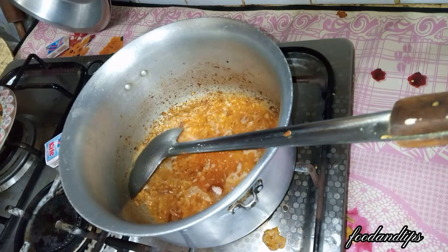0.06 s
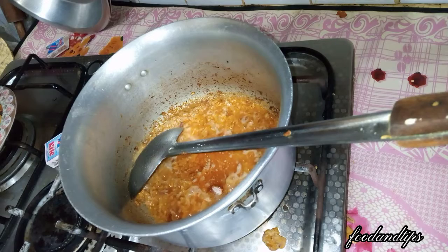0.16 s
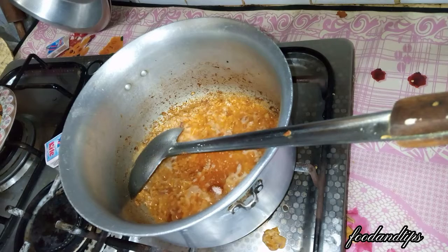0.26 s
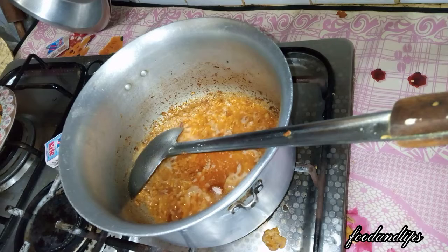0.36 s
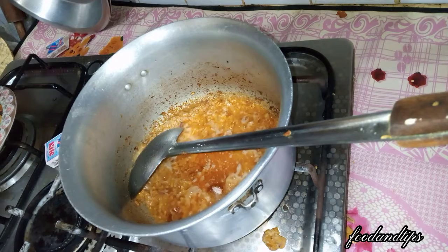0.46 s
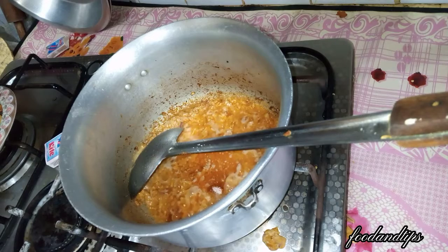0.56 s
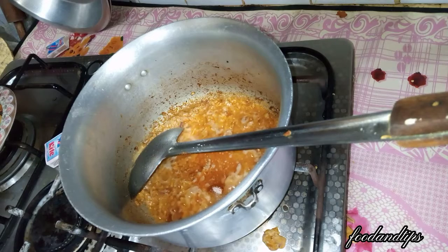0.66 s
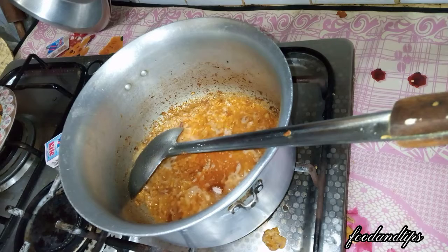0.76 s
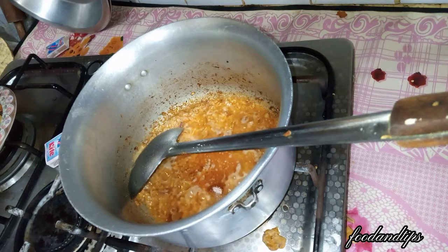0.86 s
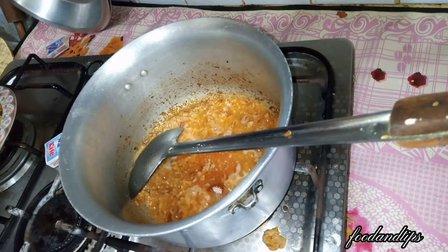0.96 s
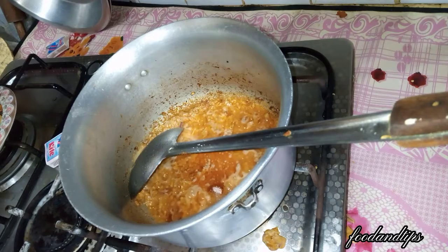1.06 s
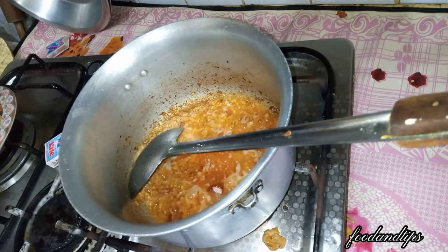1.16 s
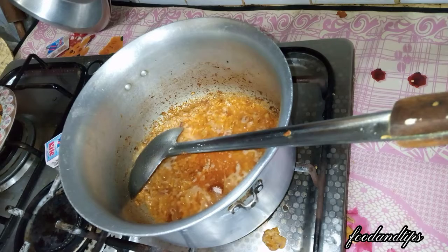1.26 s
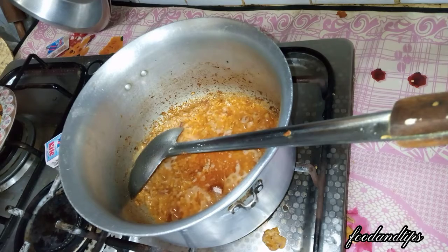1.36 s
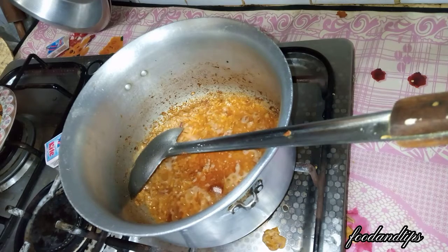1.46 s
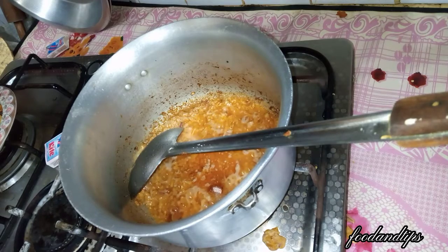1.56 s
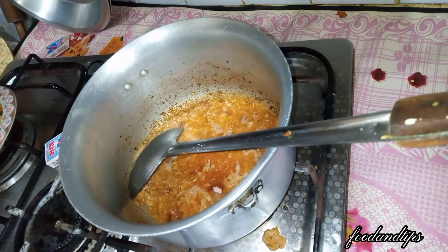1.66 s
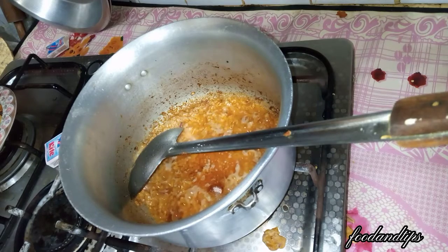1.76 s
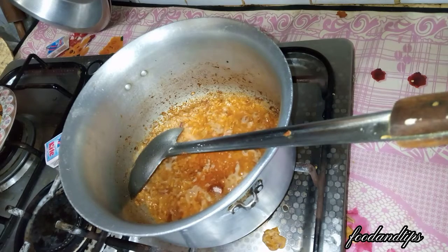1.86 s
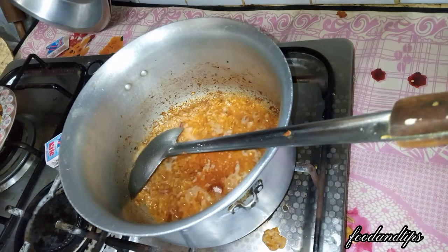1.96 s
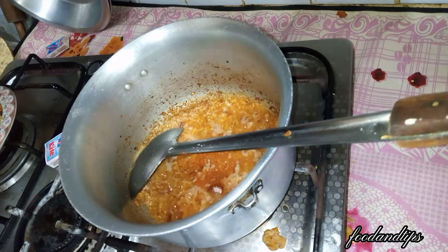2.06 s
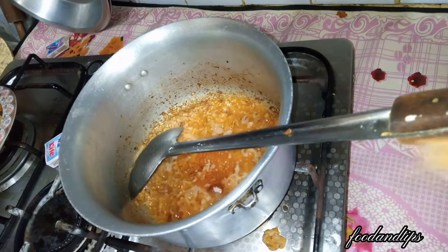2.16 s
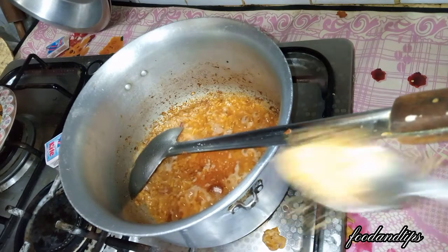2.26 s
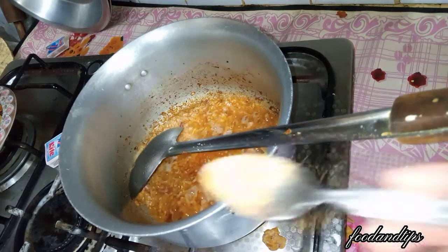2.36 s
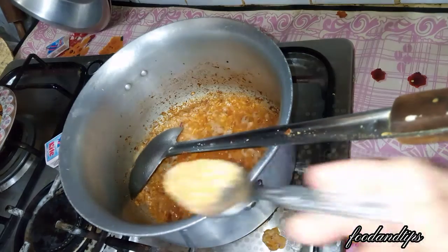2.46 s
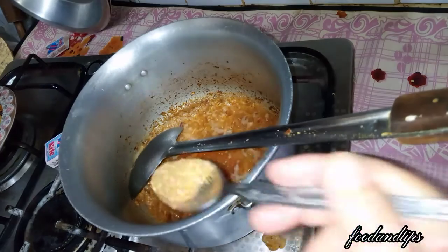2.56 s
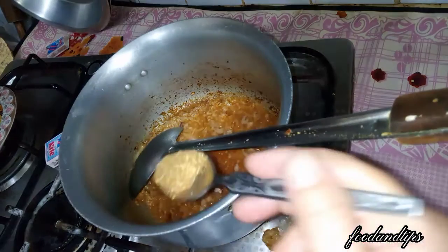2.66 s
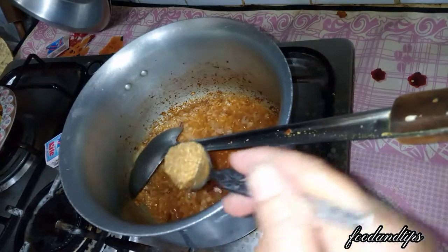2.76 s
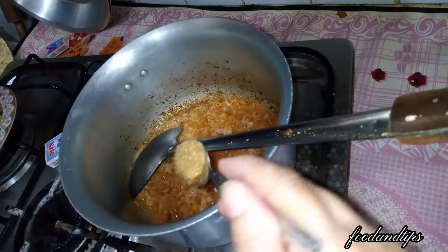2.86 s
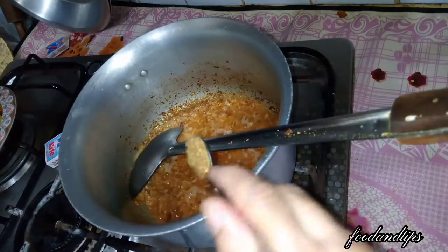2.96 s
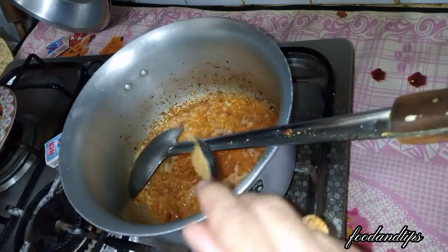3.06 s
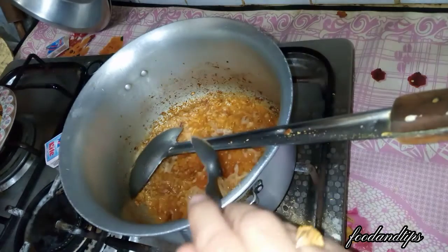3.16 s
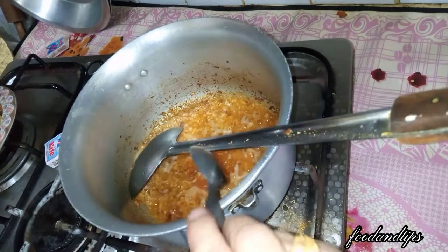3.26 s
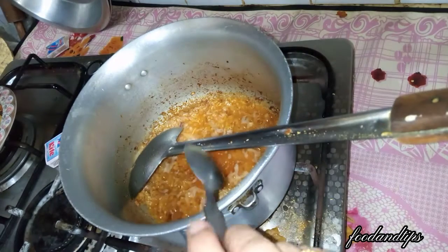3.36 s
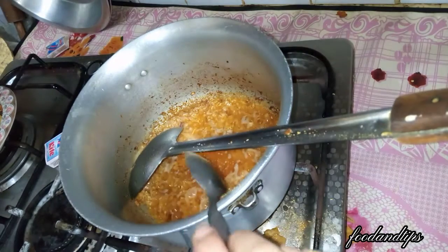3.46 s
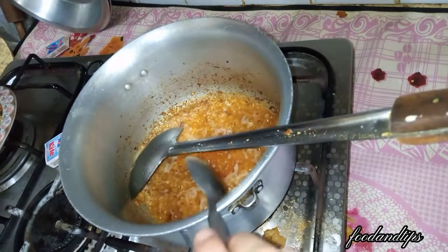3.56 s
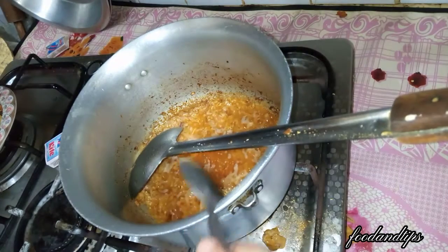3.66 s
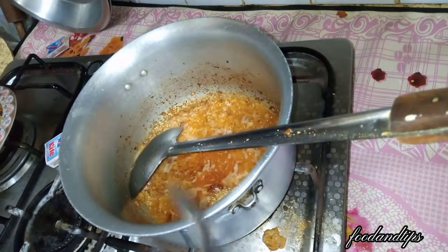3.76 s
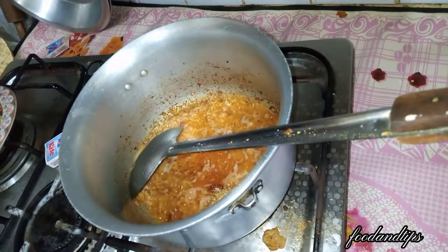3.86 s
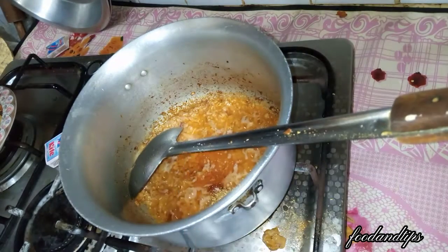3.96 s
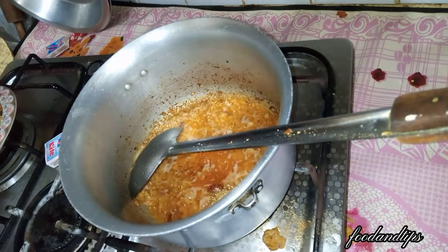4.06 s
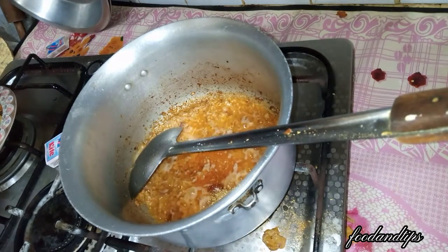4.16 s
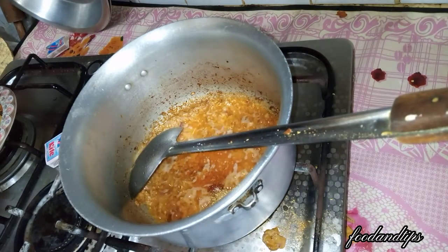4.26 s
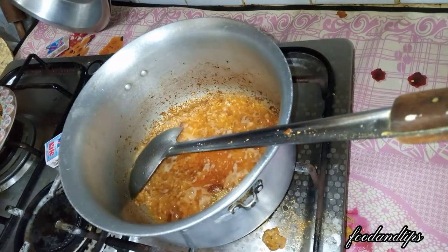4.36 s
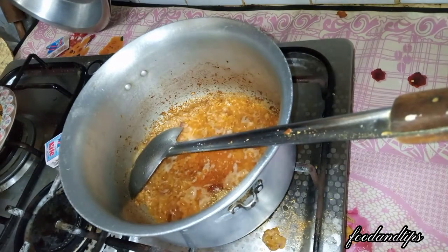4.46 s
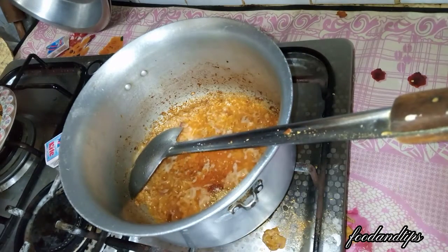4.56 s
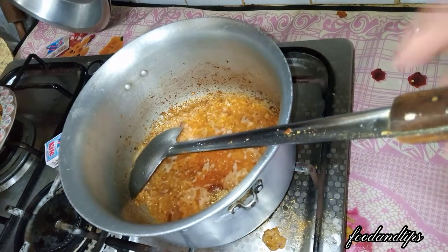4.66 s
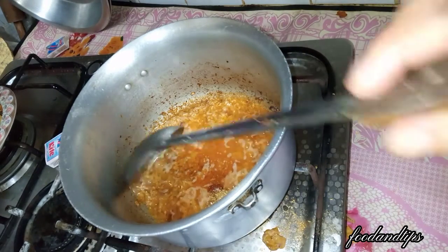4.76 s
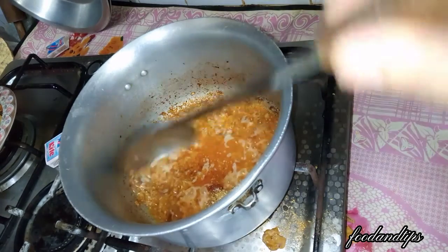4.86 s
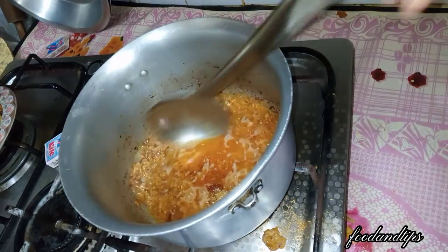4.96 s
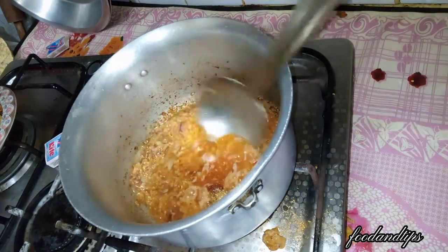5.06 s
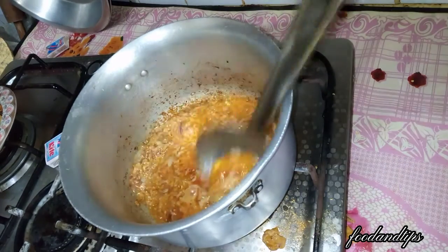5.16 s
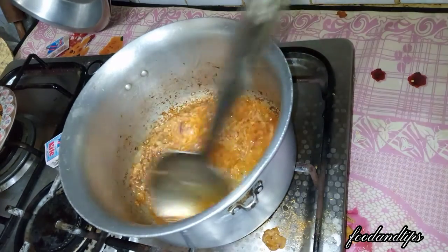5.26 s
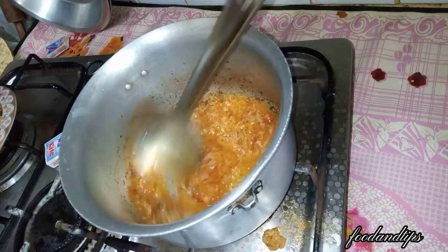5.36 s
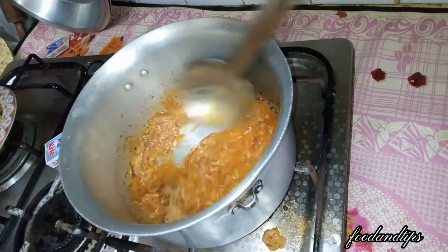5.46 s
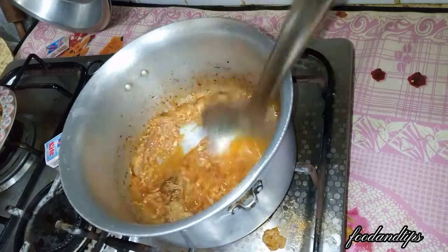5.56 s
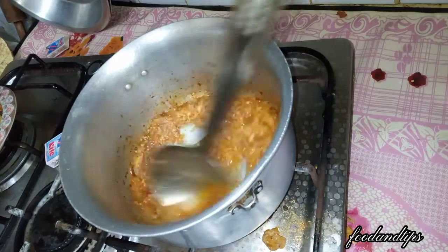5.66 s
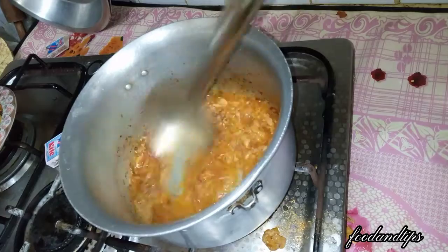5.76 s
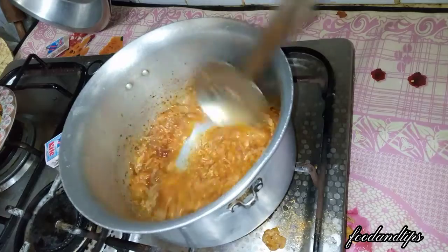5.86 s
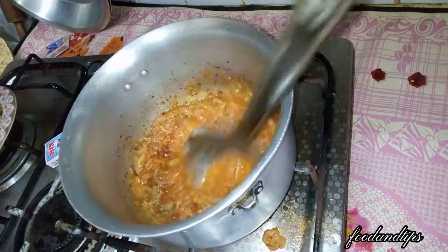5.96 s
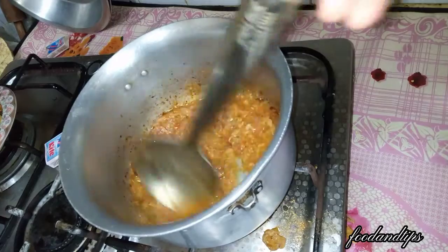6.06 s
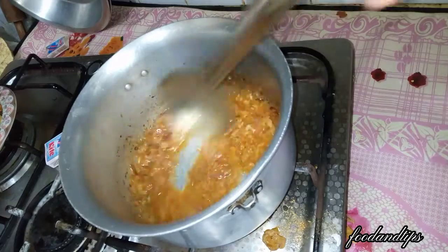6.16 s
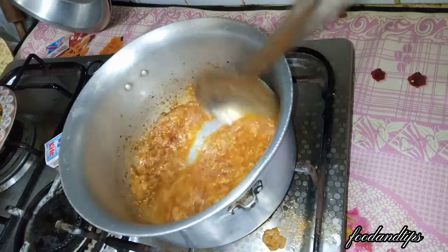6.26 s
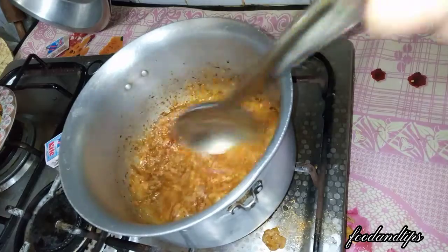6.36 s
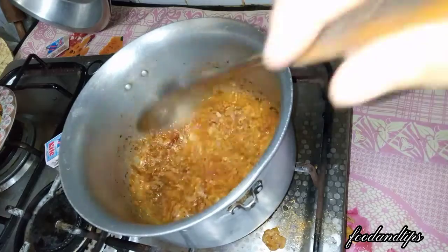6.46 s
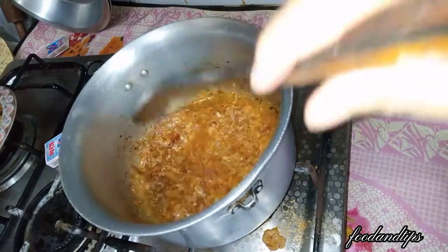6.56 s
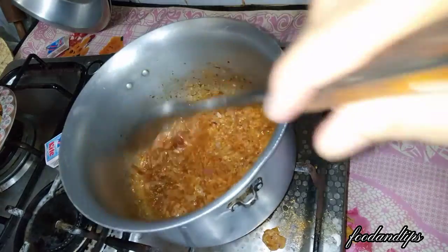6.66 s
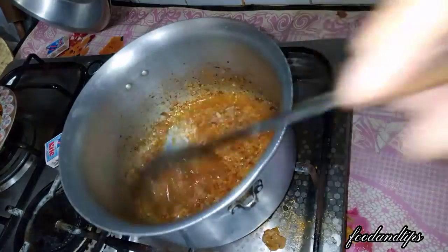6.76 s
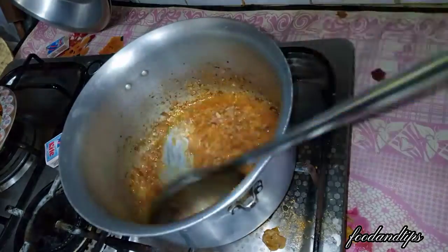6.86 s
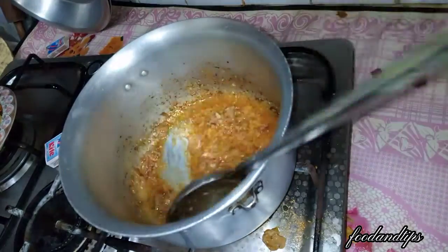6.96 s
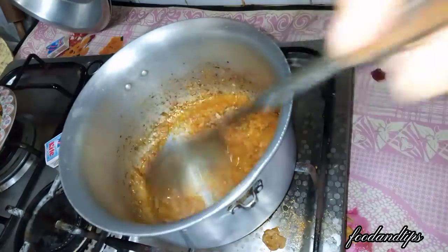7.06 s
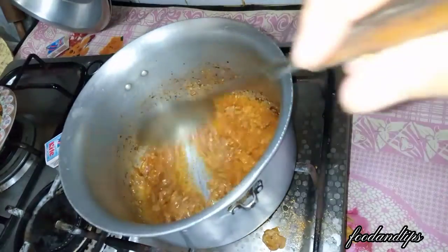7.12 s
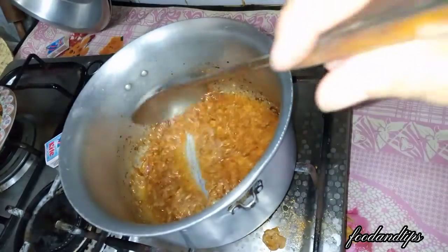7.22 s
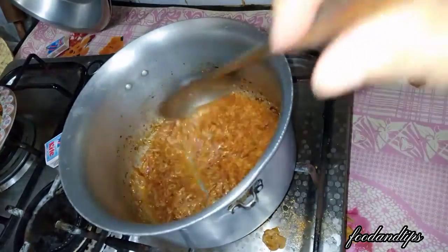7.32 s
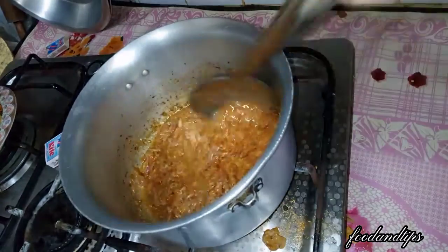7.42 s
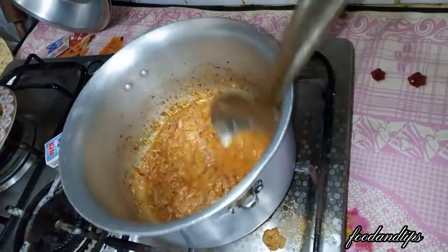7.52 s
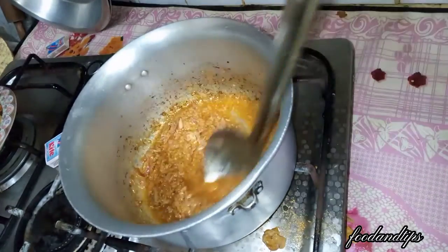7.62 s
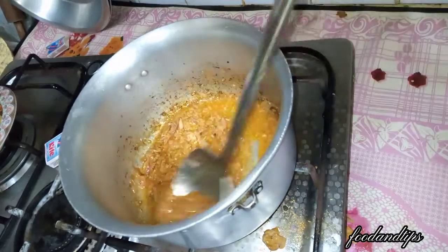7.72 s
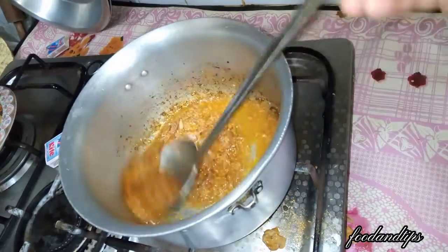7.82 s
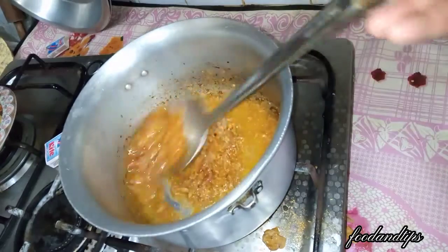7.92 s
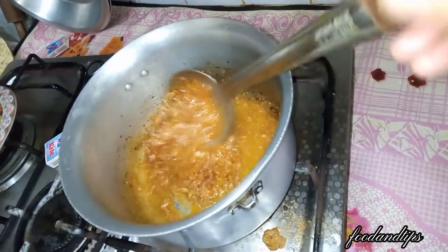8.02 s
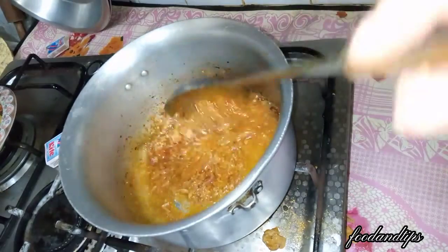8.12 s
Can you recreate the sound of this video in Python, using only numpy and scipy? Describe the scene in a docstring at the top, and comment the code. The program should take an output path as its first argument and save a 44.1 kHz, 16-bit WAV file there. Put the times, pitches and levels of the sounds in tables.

```python
"""Stirring a sizzling pot

Onions sizzle in oily sauce in an aluminium pot on a gas stove, in a small hard-walled kitchen.
Dull knocks come from further off, and a spoon of paste is tapped off against the resting steel ladle.
Then the ladle stirs: it clanks, rings, and scrapes the pot through the thick food.
Blows are short noise bursts and dying sines; scraping and sizzling are random clicks through resonances."""
import sys
import numpy as np
from scipy import signal
from scipy.fft import rfft, irfft
from scipy.io import wavfile

SR = 44100
rng = np.random.default_rng(int(sys.argv[2]) if len(sys.argv) > 2 else 0)


def output_pcm(signal):
    """Save a mono or channel-first signal as 16-bit PCM at the path in sys.argv[1].

    Samples are clipped to [-1, 1] before scaling.
    """
    pcm = np.clip(np.atleast_2d(signal).T, -1, 1) * 32767
    wavfile.write(sys.argv[1], SR, np.round(pcm).astype(np.int16))


N = 361179
T = np.arange(N) / SR  # time in seconds

# In all tables the levels are relative: the function that plays them may add its own trim in dB.
# The ladle is struck, or strikes the wall, and rings. Each row: start in seconds, tick in dB,
# thud of the pot in dB, ring in dB, pitch rung hardest in Hz, high shimmer in dB.
LADLE_CLANGS = [(2.134, -27, -43, -29, 2330, -40), (3.227, -26.5, -57, -36.5, 2560, -60),
                (3.452, -25.5, -32, -30, 3400, -58), (3.596, -12, -24, -17.5, 2060, -19.5),
                (3.654, -12, -26.5, -16, 2700, -16), (5.130, -23, -40, -19, 2200, -26),
                (5.213, -12.5, -24.5, -19, 3020, -12.5), (5.361, -24.5, -22.5, -22.5, 1850, -43),
                (5.832, -14.5, -24.5, -17.5, 3120, -42), (5.956, -24.5, -35, -26, 2580, -44),
                (6.553, -41, -31, -37, 2530, -57), (6.955, -19, -20.5, -18.5, 1400, -33),
                (8.024, -46, -37, -38.5, 1900, -56), (8.059, -29, -40, -48, 2160, -51)]
# The ladle, muffled by the food, bumps the pot's base. Each row: start in seconds, thud in dB, tick in dB.
BASE_BUMPS = [(2.19, -42.5, -35.5), (4.872, -33.5, -52), (6.022, -19, -34), (6.645, -13.5, -20.5),
              (6.878, -30.5, -42), (7.075, -22, -36), (7.182, -34, -42.5), (7.338, -21, -30.5),
              (7.620, -23.5, -26.5)]
# The ladle's edge catches on the metal with a bright scratch.
# Each row: start in seconds, scratch in dB, clank of the wall in dB.
EDGE_CATCHES = [(5.361, -30, -38), (5.561, -26, -38), (6.187, -29.5, -35), (6.299, -35.5, -37.5),
                (6.644, -22, -36), (6.757, -31.5, -29.5), (6.955, -16, -30), (7.413, -26, -58),
                (7.472, -27, -47), (7.789, -33.5, -58), (7.943, -41.5, -52)]
# Middle and high tones of the steel ladle. Each row: pitch in Hz, level in dB, seconds to die by 60 dB.
LADLE_TONES = [(1740, -12, .12), (1825, -8, .16), (1861, -2, .32), (2680, -10, .18), (2698, 1, .36),
               (3445, -3, .25), (4213, -4, .2)]
# Highest, glittering tones of the ladle. Each row: pitch in Hz, level in dB, seconds to die by 60 dB.
SHIMMER_TONES = [(4762, -2, .24), (4892, 0, .27), (4969, -7, .22), (5087, -2, .2), (5150, -4, .14),
                 (5230, -9, .14), (5776, -13, .18), (6218, -10, .12), (6720, -12, .16), (7380, -12, .12),
                 (8290, -27, .2)]
# Tones of the full pot. Each row: pitch in Hz, level in dB, seconds to die by 60 dB.
POT_TONES = [(192, -15, 0.75), (255.9, 2, 0.75), (314, 10, 0.12), (381.7, 2, 0.4), (448, 0, 0.18),
             (478, 9, 0.096), (573, -3.5, 0.55), (634, 0, 0.35), (808.6, 2, 0.2)]
# Colour of the thud of the pot's base. Each row: frequency in Hz, level in dB.
THUD_COLOUR = [(50, -26), (130, -13.5), (220, -4), (450, 1), (650, -3), (900, -14), (1500, -76),
               (4000, -68)]
# Colour of the clank of the pot's wall. Each row: frequency in Hz, level in dB.
CLANK_COLOUR = [(400, -10), (900, -3.5), (1230, 6), (1550, 0), (2000, 1), (2900, -0.5), (4000, -4),
                (9000, -34)]
# Colour of the tick at the contact spot. Each row: frequency in Hz, level in dB.
TICK_COLOUR = [(600, -27), (2000, -14.5), (2800, -40), (3800, -9), (4900, 10.5), (5600, -5.5), (6800, 0),
               (7500, -0.5), (8200, -20), (10000, -18.5), (13000, -46), (15500, -21)]
# Colour of the scratch of the ladle's edge. Each row: frequency in Hz, level in dB.
GRIT_COLOUR = [(600, -58), (2000, -36), (2800, -14), (3900, -23), (5100, 5), (5550, -5), (6200, 1.5),
               (6800, -2), (7450, -9), (8200, -20), (10000, -24.5), (13500, -38), (15400, -18)]
CLANK_DB = -6.0  # the wall's clank in a clang, relative to the tick
BUMP_CLANK_DB = -8.5  # the wall's clank in a bump, relative to the thud


def blow(mix, s, tick_db, clank_db, thud_db):
    """One blow: the tick of the contact, the clank of the wall, the thud of the base and the pot's tones."""
    add(mix, s, amp(tick_db) * burst(TICK_COLOUR, t60=0.028))
    add(mix, s, amp(clank_db) * burst(CLANK_COLOUR, t60=0.014))
    add(mix, s, amp(thud_db) * burst(THUD_COLOUR, t60=0.04))
    add(mix, s, amp(thud_db - 25) * ring(POT_TONES))


def clanks():
    """Each blow gives a crack and a thud; when the ladle is free it rings on."""
    blows, rings = np.zeros((2, N))
    for s, tick_db, thud_db, ring_db, centre_hz, shimmer_db in LADLE_CLANGS:
        blow(blows, s, tick_db, tick_db + CLANK_DB, thud_db)
        add(rings, s, amp(ring_db) * ring(LADLE_TONES, centre_hz, fall_db=25))
        add(rings, s, amp(shimmer_db - 4.5) * ring(SHIMMER_TONES))
    for s, thud_db, tick_db in BASE_BUMPS:
        blow(blows, s, tick_db, thud_db + BUMP_CLANK_DB, thud_db)
    for s, scratch_db, clank_db in EDGE_CATCHES:
        scratch = amp(scratch_db) * burst(GRIT_COLOUR, t60=0.028)
        clank = amp(clank_db) * burst(CLANK_COLOUR, t60=0.017)
        add(blows, s, scratch + clank)
    rings = rings + amp(-9) * kitchen(rings)
    return blows + amp(-3.0) * kitchen(blows) + rings


# The ladle's bowl rings free until it is pressed into the food.
# Each row: start in seconds, level in dB, moment of damping in seconds.
BOWL_RINGS = [(3.596, -32, 3.66), (5.212, -11.3, 5.85), (6.554, -28, 6.9), (6.953, -24.5, 7.8)]
# Long, low tones of the bowl. Each row: pitch in Hz, level in dB, seconds to die by 60 dB.
BOWL_TONES = [(372, -14, .7), (1033.5, 0, 1.25), (1168, -4, .2), (1245, -4, .1), (1860, -8, .65)]


def bowl_rings():
    """The bell-like bowl of the ladle rings in long sines, then is damped by 110 dB per second."""
    out, t = np.zeros(N), T[:SR]
    for s, db, stop_s in BOWL_RINGS:
        damping = amp(-110 * np.maximum(t - (stop_s - s), 0))
        add(out, s, amp(db) * ring(BOWL_TONES) * damping)
    return out


# The pot rocks on its grate and booms. Each row: start in seconds, level in dB, pitch in Hz.
POT_BOOMS = [(2.16, -39.5, 213), (3.62, -23.5, 250.5), (6.022, -27, 318), (6.03, -29, 205),
             (6.554, -31, 248), (6.645, -25, 200), (6.84, -30, 241), (6.98, -26, 253.5),
             (7.076, -20.5, 241.8), (7.619, -25, 194)]


def pot_booms():
    """The heavy pot booms softly: each boom is one low sine that builds slowly and dies."""
    out = np.zeros(N)
    for s, db, hz in POT_BOOMS:
        add(out, s, amp(db) * ring([(hz, 3, .36)], rise_s=0.011))
    return out


# Strokes of the ladle. Each row: start in seconds, length in seconds, scraping on bare metal in dB,
# grinding on the wall in dB, push on the pot in dB, change of pressure over the stroke in dB.
LADLE_STROKES = [(4.912, 0.077, -41, -44.5, -44, 9.5), (5.139, 0.067, -53, -27.5, -25, -8),
                 (5.228, 0.27, -30, -26, -31, 1.5), (5.547, 0.31, -27, -26, -32, 3.5),
                 (5.955, 0.18, -26, -24.5, -30.5, -6.5), (6.23, 0.041, -26.5, -45, -52, -15.5),
                 (6.554, 0.055, -34, -33, -21, -6), (6.632, 0.27, -35.5, -30.5, -21, -9.5),
                 (6.961, 0.18, -45, -30.5, -23, -3.5), (7.422, 0.16, -30, -37, -37, 7),
                 (7.607, 0.21, -26.5, -27, -22, -16.5), (8.039, 0.024, -40, -36.5, -39.5, -5.5)]
BITE_S, LIFT_DB_PER_S = .008, 207  # the edge bites almost at once and lifts off gradually
ROCK_DB, ROCK_FALL_DB_PER_S = -3.0, 134  # after a bump the pot judders, relative to the thud


def pressure():
    """Gains of scraping, grinding and pushing: each stroke bites, presses on and lifts off; bumps rock the pot."""
    power = np.zeros((3, N))
    for s, length, scrape_db, grind_db, push_db, change_db in LADLE_STROKES:
        bite = np.clip((T - s) / BITE_S, 0, 1)
        press = amp(change_db * np.clip((T - s) / length, 0, 1))
        stroke = bite * press * fade(s + length, LIFT_DB_PER_S)
        power += np.outer(amp([scrape_db, grind_db, push_db]), stroke) ** 2
    for s, thud_db, _ in BASE_BUMPS:
        rocking = amp(thud_db + ROCK_DB) * (T > s) * fade(s, ROCK_FALL_DB_PER_S)
        power[2] += rocking ** 2
    return np.sqrt(power)


def travelling(x, spectrum, t60, turns_per_s=2.4, count=3):
    """The contact point travels round the pot, so the excited modes keep changing."""
    angle = 2 * np.pi * turns_per_s * T
    places = [np.maximum(np.cos(angle - 2 * np.pi * k / count), 0) for k in range(count)]
    sound = sum(through(x * place, burst(spectrum, t60)) for place in places)
    return sound / np.linalg.norm(places, axis=0)


# Colour of the juddering pot. Each row: frequency in Hz, level in dB.
RUMBLE_COLOUR = [(35, -60), (55, 3), (72, 1.5), (110, -0.5), (200, 2), (260, 5), (450, 12), (700, -9.5),
                 (1000, -20.5), (2000, -61)]


def stirring():
    """The ladle's edge sticks and slips; the slips excite ladle and wall, and the pot judders on its grate."""
    scrape, grind, push = pressure()
    slips = scrape * unit(clicks(per_s=1100, spread_db=4.0) * amp(2.2 * wander(rate_hz=110)))
    catches = grind * unit(clicks(per_s=1000, spread_db=3.0) * amp(2.0 * wander(rate_hz=70)))
    judder = push * clicks(per_s=350, spread_db=3.5)

    metal = amp(-2.5) * travelling(slips, GRIT_COLOUR, t60=0.025)
    metal += amp(-17.5) * through(slips, ring(SHIMMER_TONES))
    metal += amp(-16) * through(slips, ring(LADLE_TONES))
    wall = amp(-4.0) * travelling(catches, CLANK_COLOUR, t60=0.04)
    base = amp(-7.5) * colour(judder, RUMBLE_COLOUR) + amp(-8.5) * through(judder, ring(POT_TONES))
    out = metal + wall + base
    return out + amp(-9.0) * kitchen(out)


# The bare edge bows the ladle so that it sings. Each row: loudest moment in seconds, level in dB.
LADLE_SINGING = [(5.3, -33), (5.6, -30), (7.562, -24)]
SING_RISE_DB_PER_S, SING_FALL_DB_PER_S = 211, 121


def singing():
    """The edge bows the ladle's middle modes: steady noise sets each mode ringing, swelling and fading."""
    bowed = np.zeros(N)
    for mode in LADLE_TONES:
        bowed += amp(mode[1]) * unit(through(rng.standard_normal(N), ring([mode])))
    bowing = np.zeros(N)
    for s, db in LADLE_SINGING:
        swell = amp(db - SING_RISE_DB_PER_S * np.maximum(s - T, 0))
        bowing += swell * fade(s, SING_FALL_DB_PER_S)
    return unit(bowed) * bowing


# The edge chatters with a rough note.
# Each row: start in seconds, length in seconds, level in dB, pitch halfway through in Hz.
EDGE_CHATTER = [(5.564, 0.07, -23, 3060), (5.581, 0.057, -20, 1820), (5.949, 0.043, -21, 2770),
                (6.04, 0.11, -30.5, 1300), (6.232, 0.11, -40, 2410)]
CHATTER_SAG = 0.13  # share by which each note falls as the edge slows
CHATTER_WIDTH_HZ = 490


def chattering():
    """The edge chatters on bare metal: random slips drive a broad resonance that falls in pitch."""
    slips, chatter = clicks(per_s=1500, spread_db=5), np.zeros(N)
    for s, length, db, hz in EDGE_CHATTER:
        during = slips[round(s * SR):round((s + length) * SR)]
        progress = np.linspace(0, 1, len(during))
        falling_hz = hz * (1 - CHATTER_SAG * (progress - .5))
        note = unit(resonate(during, falling_hz, width_hz=CHATTER_WIDTH_HZ))
        add(chatter, s, amp(db) * np.sin(np.pi * progress) * note)
    return amp(-3.0) * chatter + amp(-16) * kitchen(chatter)


# The small spoon's own hollow clack as the paste is tapped off. Each row: start in seconds, level in dB.
PASTE_TAPS = [(3.226, -34), (3.452, -34), (3.596, -26)]
# Tones of the spoon. Each row: pitch in Hz, level in dB, seconds to die by 60 dB.
SPOON_TONES = [(510, -7, 0.13), (613, 2, 0.17), (702, -5, 0.21), (800, 6, 0.052), (1276, -15, 0.34)]


def spoon_taps():
    """The near spoon clacks as a few dying sines, and the kitchen answers."""
    near = np.zeros(N)
    for s, db in PASTE_TAPS:
        add(near, s, amp(db - 10) * ring(SPOON_TONES))
    return near + amp(5.5) * kitchen(near)


# Dull knocks across the kitchen. Each row: start in seconds, level in dB.
FAR_KNOCKS = [(0.66, -30), (.666, -34.5), (.812, -39), (0.831, -53), (0.959, -29), (.966, -33),
              (4.858, -34.5), (4.875, -47)]
# Colour of a knock. Each row: frequency in Hz, level in dB.
KNOCK_SPECTRUM = [(88, -19), (150, -32), (258, -29), (362, -3), (914, -13.5), (1100, -0.5), (1290, -12.5),
                  (1840, -18.5), (2240, -30), (2730, -22), (3150, -32), (4500, -25.5), (5850, -47),
                  (9900, -120)]
# Tones of a knock. Each row: pitch in Hz, level in dB, seconds to die by 60 dB.
KNOCK_TONES = [(385, -3, 0.03), (526, -2, 0.05), (900, -5, 0.04), (1080, -6, 0.05), (1430, -8, .06),
               (1725, -9, .05)]


def far_knocks():
    """Distant knocks, short bursts and brief tones, heard largely by way of the walls."""
    far = np.zeros(N)
    for s, db in FAR_KNOCKS:
        add(far, s, amp(db + 1.5) * burst(KNOCK_SPECTRUM, t60=0.022))
        add(far, s, amp(db - 12) * ring(KNOCK_TONES))
    return amp(-1.0) * far + amp(1.0) * kitchen(far)


# Frying flares as the food is turned over, dies down, then picks up at the end.
# Each row: time in seconds, level in dB.
FRYING_LEVEL = [(0, -44.5), (2.4, -44), (3.6, -40), (4.8, -43), (5.3, -38), (6.4, -50.5), (7.3, -57),
                (8.19, -46)]
# Colour of the sizzle. Each row: frequency in Hz, level in dB.
SIZZLE_COLOUR = [(590, -32), (1000, -25), (1280, -5.5), (1570, -14.5), (2080, -4.5), (2250, -16),
                 (2390, -10.5), (3980, -10), (4520, -3), (5970, 4.5), (7190, -6.5), (8070, -21.5),
                 (13400, -26.5), (14900, -19), (16000, -1)]


def frying():
    """Tiny bubbles burst in the hot oil as random clicks, some with a brief pitch."""
    pops = colour(clicks(per_s=5000, spread_db=-1.0), SIZZLE_COLOUR) * amp(2.0 * wander(rate_hz=20))
    bubbles = np.zeros(N)
    for hz in rng.uniform(1168, 12000, size=40):
        bursts = clicks(per_s=20, spread_db=2.5)
        bubbles += amp(read(SIZZLE_COLOUR, hz)) * through(bursts, ring([(hz, 0, .04)]))
    oil = (pops + amp(-10.5) * unit(bubbles)) * amp(.8 * wander(rate_hz=3))
    level = amp(np.interp(T, *np.transpose(FRYING_LEVEL)))
    return unit(oil + amp(-12.5) * kitchen(oil)) * level


# Colour of the gas flame's rush. Each row: frequency in Hz, level in dB.
FLAME_COLOUR = [(15, -80), (25, -19), (81, 3), (189, -7.5), (221, -7), (324, 0), (357, -13), (433, -6),
                (687, -13), (866, -9.5), (991, -14.5), (1270, -17.5), (2500, -17.5), (3250, -46),
                (5500, -120)]
FLAME_DB, FLAME_FLICKER_DB = -54, 1.6  # overall level, and typical size of the flicker


def gas_flame():
    """The flame's soft rush: coloured noise whose level flickers slowly."""
    rush = colour(rng.standard_normal(N), FLAME_COLOUR, size=8192)
    return amp(FLAME_DB) * unit(rush * amp(FLAME_FLICKER_DB * wander(rate_hz=4.4)))


# How long the kitchen echoes. Each row: frequency in Hz, seconds to die by 60 dB.
KITCHEN_DECAY = [(150, 0.95), (400, 0.21), (1000, 0.26), (2800, 0.41), (7000, 0.27), (15000, 0.075)]


def kitchen(x, gap_s=0.00456):
    """Reverberation: sparse reflections that start after a short gap and die band by band."""
    taps = rng.standard_normal(SR) * (rng.random(SR) < .1) * (T[:SR] > gap_s)
    hz, t, z = signal.stft(taps, SR, nperseg=256)
    decay = amp(-60 * t / read(KITCHEN_DECAY, hz)[:, None])
    return through(x, signal.istft(z * decay, SR, nperseg=256)[1])


def amp(db):
    """Decibels to gain."""
    return 10 ** (np.asarray(db) / 20)


def unit(x):
    """Scales to an rms (average strength) of one."""
    return x / np.sqrt(np.mean(x ** 2) + 1e-20)


def read(points, hz):
    """Reads a table between its rows, on a log-frequency axis."""
    f, value = np.transpose(points)
    return np.interp(np.log(hz + 1), np.log(f + 1), value)


def add(mix, s, sound):
    """Mixes a sound in at time s."""
    part = mix[round(s * SR):][:len(sound)]
    part += sound[:len(part)]


def fade(s, db_per_s):
    """Gain that holds until time s and then dies away."""
    return amp(-db_per_s * np.maximum(T - s, 0))


def through(x, response):
    """Convolves with a response scaled to unit energy."""
    return signal.oaconvolve(x, response / np.linalg.norm(response))[:len(x)]


def colour(x, spectrum, size=2048):
    """Filters with the given spectrum, causally, so nothing sounds before its cause."""
    log_gain = np.log(amp(read(spectrum, abs(np.fft.fftfreq(size, 1 / SR)))))
    # the Hilbert transform supplies the phase of a minimum-phase filter
    return through(x, np.fft.ifft(np.exp(np.conj(signal.hilbert(log_gain)))).real)


def ring(modes, centre_hz=2700, fall_db=0, rise_s=0.0019):
    """Dying sines that take a moment to build; the place of the blow can favour modes near one frequency."""
    t, out = T[:SR], np.zeros(SR)
    for hz, db, t60 in modes:
        start_db = db - fall_db * np.log2(hz / centre_hz) ** 2
        out += amp(start_db - 60 * t / t60) * np.sin(2 * np.pi * hz * t)
    return out * (1 - np.exp(-t / rise_s))


def burst(spectrum, t60, size=260):
    """Many close modes struck at once and soon damped: dying noise, rms one over the first samples."""
    t = T[:SR // 3]
    sound = colour(rng.standard_normal(len(t)) * amp(-60 * t / t60), spectrum)
    return sound / np.sqrt(np.mean(sound[:size] ** 2))


def clicks(per_s, spread_db):
    """Random impulses of random size and sign; a positive spread makes a few of them large."""
    size = amp(spread_db * np.minimum(rng.exponential(1, N), 5)) * rng.choice([-1, 1], N)
    return unit(size * (rng.random(N) < per_s / SR))


def wander(rate_hz):
    """Smooth random curve of rms one, mostly slower than the given rate."""
    smoothing = 1 + (np.fft.rfftfreq(N, 1 / SR) / rate_hz) ** 4
    return unit(irfft(rfft(rng.standard_normal(N)) / smoothing, N))


def resonate(x, hz, width_hz):
    """A resonance that follows the curve hz: shift down to zero, smooth, shift back up."""
    turn = np.exp(2j * np.pi * np.cumsum(hz) / SR)
    r = np.exp(-np.pi * width_hz / SR)
    return (turn * signal.lfilter([1], [1, -2 * r, r * r], x / turn)).real


def scene():
    """Everything at the stove, in one channel."""
    ladle = clanks() + bowl_rings() + stirring() + singing() + chattering()
    return (ladle + pot_booms() + spoon_taps() + far_knocks() + frying() + gas_flame())[None]


OVERLOAD = .95  # largest sample value before the peaks are cut off
EDGE_HZ = 15800  # upper band limit


def record(dry):
    """A small microphone drops the deep bass, the loudest peaks overload; then the band limit."""
    thin = signal.sosfilt(signal.butter(3, 60, "high", fs=SR, output="sos"), dry)
    clipped = np.clip(thin, -OVERLOAD, OVERLOAD)
    lowpass = signal.firwin(511, EDGE_HZ, window=("kaiser", 9), fs=SR)
    return signal.oaconvolve(clipped, lowpass[None], "same")


dry = scene()
out = record(dry)
output_pcm(out)
```